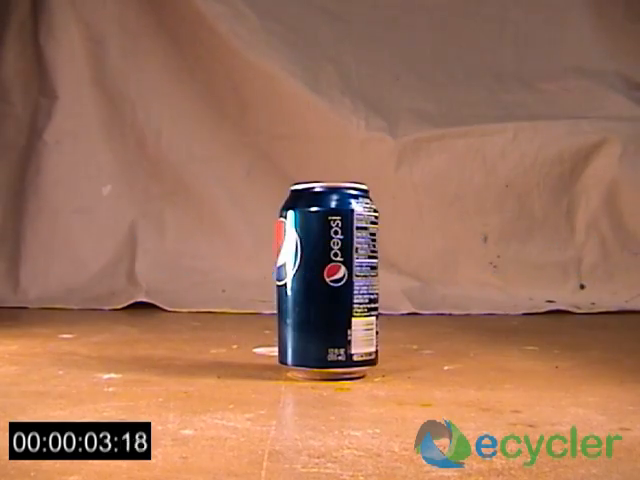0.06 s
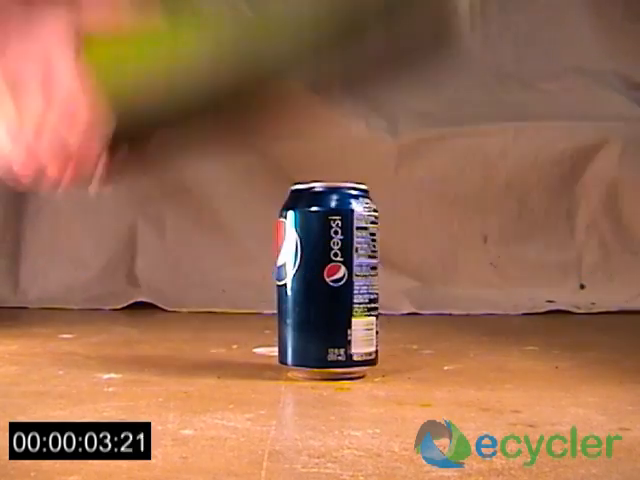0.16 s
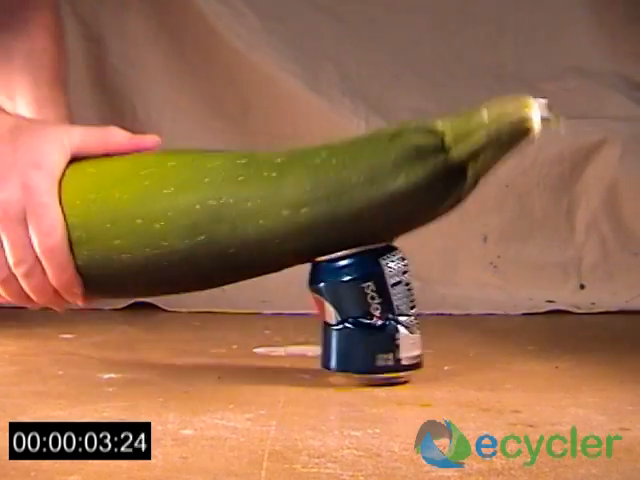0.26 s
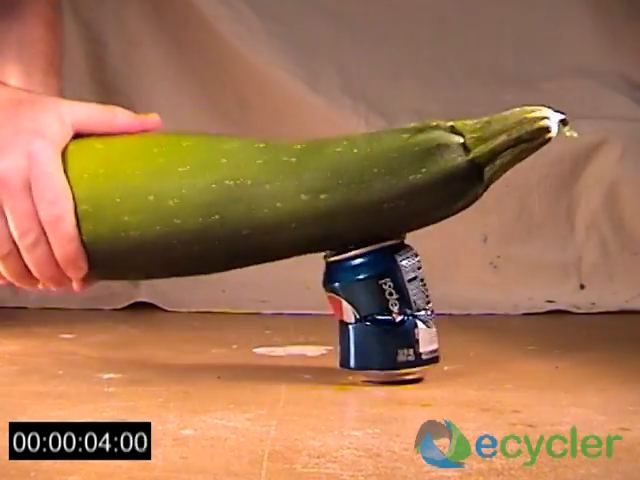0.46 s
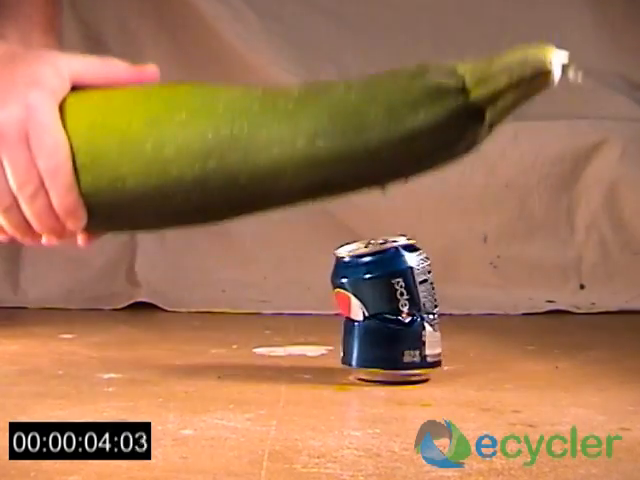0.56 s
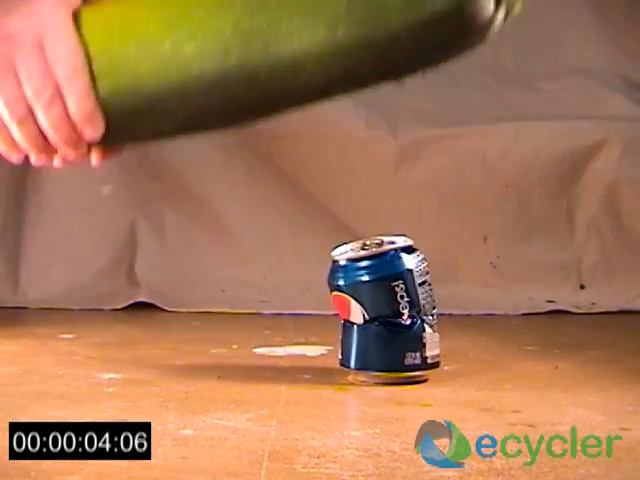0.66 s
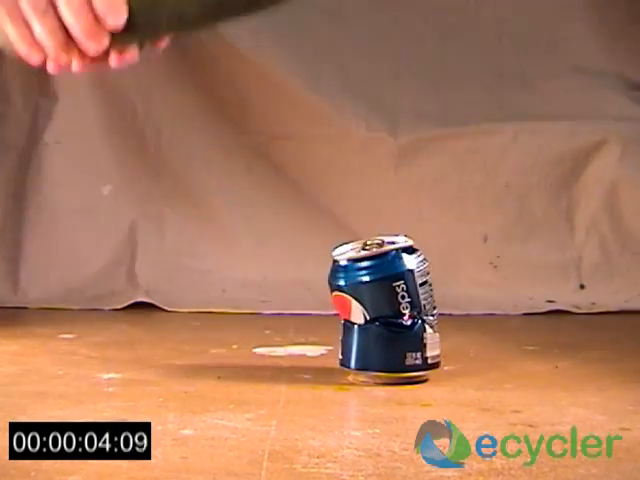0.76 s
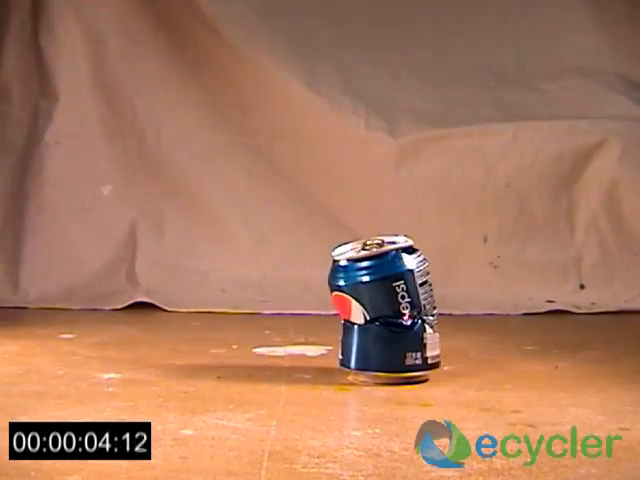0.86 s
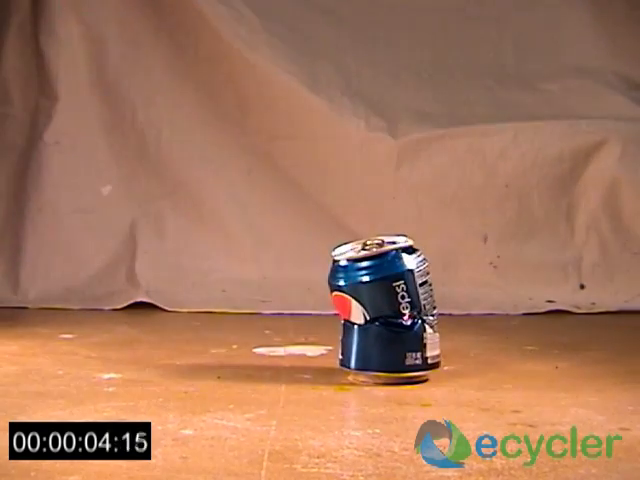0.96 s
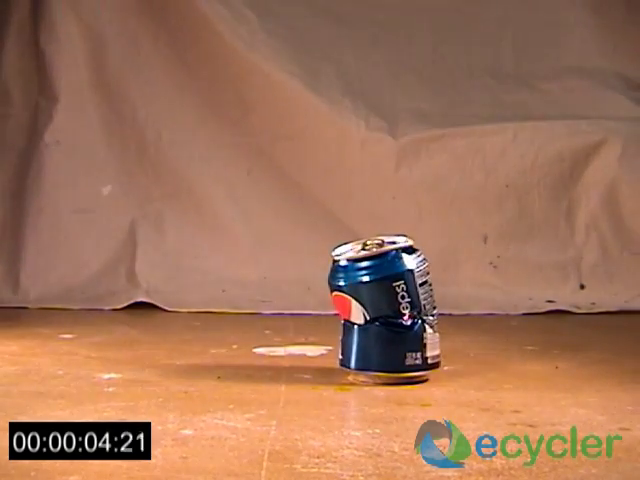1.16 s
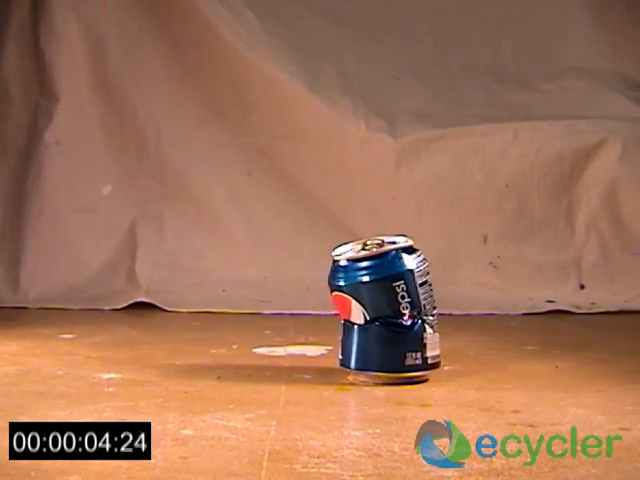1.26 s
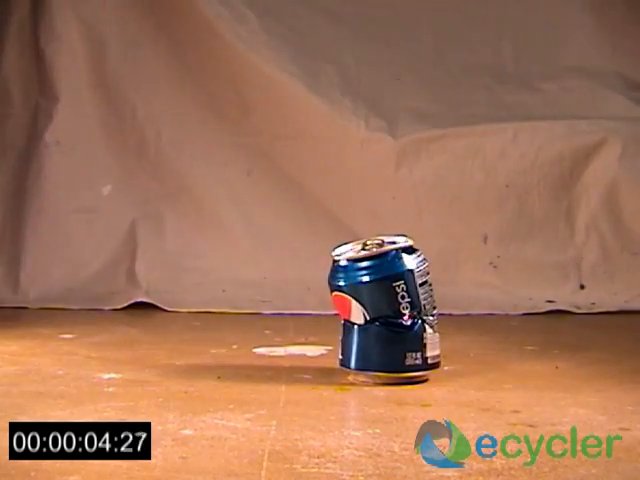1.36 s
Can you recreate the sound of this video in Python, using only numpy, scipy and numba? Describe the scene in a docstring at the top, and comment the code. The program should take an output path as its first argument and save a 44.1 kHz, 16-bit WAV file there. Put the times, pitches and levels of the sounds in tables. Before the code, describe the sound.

An empty aluminium can crunches under a heavy blow, then rocks with a few clinks.

```python
"""A small room, two microphones close to an empty aluminium can standing on a wooden table.
Over quiet room noise a big marrow swishes down. The can wall cracks and crumples in a run of snaps,
the table booms under the shoves, and the recorder's limiter flattens the blow.
Let go, the dented can rocks on its base with a few clinks that die away.
Last comes one tiny creak from the dent."""
import sys
import numpy as np
from scipy import signal
from scipy.fft import irfft, next_fast_len
from scipy.io import wavfile
from numba import njit

SR = 44100
rng = np.random.default_rng(int(sys.argv[2]) if len(sys.argv) > 2 else 0)


def inscribe(sig):
    """Save sig as 16-bit PCM at rate SR to the path in sys.argv[1].

    A 1-D sig is mono; a 2-D sig holds one channel per row.
    Samples are clipped to [-1, 1] before scaling.
    """
    pcm = np.round(np.clip(np.atleast_2d(sig).T, -1, 1) * 32767)
    wavfile.write(sys.argv[1], SR, pcm.astype(np.int16))


N = 61739

# Spectra give relative level per hertz; the noise made from them is scaled to rms 1.
# spectrum of the quiet room: f/Hz, level/dB
ROOM_TONE_SPECTRUM = [(20, -32.5), (59, -19), (84, -4), (180, -2), (212, -11.5), (242, 1), (270, -7.5),
                      (575, -10.5), (1070, -15.5), (2350, -27), (2550, -22), (6210, -30.5), (16000, -38.5)]
# reverberation time of the room: f/Hz, t60/s
ROOM_DECAY = [(150, 0.32), (600, 0.51), (1800, 0.49), (4200, 0.48), (9000, 0.34), (15000, 0.22)]
# rustle of the swing as the marrow comes down: t/s, level/dB
SWING_LEVELS = [(0.0, -58), (0.06, -52), (0.088, -44), (0.23, -51)]
# spectrum of that rustle: f/Hz, level/dB
SWING_SPECTRUM = [(100, -23.5), (350, -0.5), (1500, 1), (2300, -13.5), (8000, -11.5), (15000, -29)]
# touch-downs of the rocking can: t/s, ring level/dB, clatter level/dB, tick level/dB,
# pitch factor of the tick, landing spot (0 rim, 1 base), contact/s, rebound level/dB
TOUCH_DOWNS = [(0.528, -33.5, -27.5, -42, 1.1, 0, 0.0012, -2.5),
               (0.569, -21.5, -28, -38, 0.91, 0.14, 0.0075, -1),
               (0.619, -38, -31.5, -47, 1.1, 0.94, 0.0066, -8),
               (0.643, -15, -26.5, -22.5, 1.096, 0.19, 0.00025, 4),
               (0.708, -14.7, -21, -26.5, 1.07, 0.93, 0.00058, -5),
               (0.7495, -23.5, -21.5, -31, 1, 0, 0.0003, -4.5)]
# modes of the dented can: f/Hz, level struck on the rim/dB, level on the base/dB, t60 on the base/s
DENTED_CAN_MODES = [(463, -9, -20, .22), (538, -14, -9, .45), (858, -21, -17, .42), (969, -10, -24, .27),
                    (1068, -11, -3, .14), (1115, -7, -14, .13), (1268, -16, -16, .24), (1433, -20, -6, .07),
                    (1598, 0, -5, .12), (1780, -1, -14, .11), (1955, -7, -4, .07), (2863, -21, -1, .115),
                    (2995, -27, -11, .07), (3149, -25, -24, .22)]
# spectrum of the crowd of short modes in the dent and the table: f/Hz, level/dB
CLATTER_SPECTRUM = [(330, -17.5), (490, -4.5), (700, -11), (1100, 6.5), (1400, -4.5), (1850, 2.5),
                    (2350, -12.5), (3100, -6.5), (4500, -37)]
# spectrum of metal touching wood, before each tick's pitch factor: f/Hz, level/dB
TICK_SPECTRUM = [(1000, 0), (6400, 2.5), (8600, 0), (10500, -20.5), (16000, -40)]
# shoves of the marrow through the can into the table: t/s, level/dB
MARROW_SHOVES = [(0.2215, 0), (0.2466, 3), (0.268, -3), (0.284, 0.5), (0.302, -0.5), (0.326, -4),
                 (0.351, 0), (0.366, -10.5), (0.444, -12), (0.466, -23)]
# spectrum of the dull part of a shove: f/Hz, level/dB
THUD_SPECTRUM = [(40, -38.5), (100, -14), (180, -8), (380, 4), (520, -0.5), (750, 1), (1100, -1.5),
                 (1700, -16.5), (3500, -36)]
# modes of the table top with the can pressed on it: f/Hz, level/dB
TABLE_TOP_MODES = [(157, -11), (247, -3), (317, -9), (364, -6), (406, -4), (447, -6), (565, -5), (641, 1),
                   (663, -3), (727, -3), (757, -5), (782, -3), (851, -3), (929, -3), (1101, -4), (1309, -5),
                   (1446, -9)]
# spectrum of the first crack of the can wall: f/Hz, level/dB
CRACK_SPECTRUM = [(30, -8.5), (150, 1), (500, -18), (1300, 3), (5000, -3), (10000, -6.5), (16000, -13.5)]
# course of the buckling as the wall folds: t/s, level/dB
BUCKLING_LEVELS = [(0.224, -11), (0.246, -3), (0.256, -10.5), (0.293, -11.5), (0.335, -12), (0.365, -19.5),
                   (0.392, -15), (0.412, -22), (0.45, -49), (0.53, -40.5)]
# spectrum of one buckle: f/Hz, level/dB
BUCKLE_SPECTRUM = [(200, -20), (700, 4), (1400, -4), (2100, -1), (2700, -7), (4100, -0.5), (5600, -8),
                   (9800, -9.5), (12000, -19), (16000, -22.5)]
# creases that snap through with a bright ping: t/s, level/dB, f/Hz
CREASE_SNAPS = [(0.2404, -6.5, 4630), (0.244, -1.5, 10200), (0.2923, -10.5, 10800), (0.387, -31, 9000)]

SPLIT_HZ, ROOM_TONE_SPLIT_HZ = 9100, 3040  # the two microphones differ more and more towards these
ROOM_TONE_DB, ROOM_BUILD_S = -47, 0.0016
CLATTER_T60_S, TICK_T60_S, REBOUND_S = 0.045, 0.066, 0.00763
CLATTER_ECHO_DB, RING_ECHO_DB = -10.5, -18
RIM_DAMPING = 0.32  # share of the ring time lost when the can leans on its rim
CAN_LOW_HZ = 295.6  # the small can radiates little below this
THUMP_HZ, THUMP_DB, THUMP_T60_S = 114.5, -10, 0.039
THUD_DB, THUD_T60_S, THUD_RISE_S, THUD_ECHO_DB = -9.5, 0.11, 0.0044, -7.5
TABLE_DB, TABLE_T60_S, TABLE_LONG_HZ = -19, 0.155, 240  # t60 of the high modes; doubled at this pitch
HIT_S, CRACK_DB, CRACK_T60_S, CREASE_T60_S = 0.2222, 2.5, 0.028, 0.022
BUCKLES_PER_S, BUCKLE_SPREAD_DB, BUCKLE_T60_S, WALL_ECHO_DB = 830, 2.5, 0.023, -5
LIMIT_DB, LIMIT_ATTACK_S, LIMIT_RELEASE_S = -3, 0.00051, 0.025
LOW_CUT_HZ, HIGH_CUT_HZ = 25, 15900


def amp(db):
    """Decibels to gain."""
    return 10 ** (np.asarray(db) / 20)


def unit_rms(x):
    """Scale to rms 1."""
    return x / np.sqrt(np.mean(x ** 2))


def since(start):
    """Seconds since start, zero before it."""
    return np.maximum(np.arange(N) / SR - start, 0)


def fader(points):
    """Gain along (t/s, level/dB) points, silent outside them."""
    return amp(np.interp(since(0), *np.array(points).T, left=-200, right=-200))


def over_hz(points, hz):
    """Read (f/Hz, value) points on a log-frequency axis."""
    freqs, values = np.array(points).T
    return np.interp(np.log(np.maximum(hz, 1)), np.log(freqs), values)


def noise(spectrum, split_hz=SPLIT_HZ):
    """Coloured noise of rms 1 at the microphone pair: alike in the bass, wider in the treble."""
    size = next_fast_len(N, real=True)
    hz = np.fft.rfftfreq(size, 1 / SR)
    mid, side = np.exp(2j * np.pi * rng.random((2, len(hz))))
    width = np.clip(0.021 + hz / np.hypot(split_hz, hz), 0, 1)
    pair = (mid + np.array([[1], [-1]]) * width * side) / np.hypot(1, width)
    return unit_rms(irfft(pair * amp(over_hz(spectrum, hz)), size)[:, :N])


def strike(start, t60, contact=1 / 5000):
    """Envelope of a blow: rises over the contact time, then dies away."""
    t = since(start)
    return np.minimum(t / contact, 1) * np.exp(-np.log(1000) * np.maximum(t - contact, 0) / t60)


def ring(start, modes, contact=1 / 2000):
    """Decaying modes (f/Hz, level/dB, t60/s) set off together, alternating in sign."""
    t = since(start)
    return sum((-1) ** k * amp(db) * strike(start, t60, contact) * np.sin(2 * np.pi * hz * t)
               for k, (hz, db, t60) in enumerate(modes))


def reverberate(x, echo):
    """What the room sends back to the two microphones."""
    return signal.fftconvolve(np.atleast_2d(x), echo, axes=1)[:, :N]


def room_tone():
    """Steady, low noise of the small room, behind everything else."""
    return amp(ROOM_TONE_DB) * noise(ROOM_TONE_SPECTRUM, ROOM_TONE_SPLIT_HZ)


def room_echo():
    """Diffuse impulse response of the room: it builds quickly, then each band decays at its own rate."""
    white = noise([(20, 0), (20000, 0)])[:, :SR // 2]
    hz, t, bands = signal.stft(white, SR, nperseg=256)
    decay = np.exp(-np.log(1000) * t / over_hz(ROOM_DECAY, hz)[:, None])
    tail = signal.istft(bands * decay, SR)[1]
    tail *= 1 - np.exp(-np.arange(tail.shape[1]) / SR / ROOM_BUILD_S)
    return tail / np.sqrt(np.sum(tail ** 2) / 2)


def marrow_swing():
    """Faint rustle of the swing, just ahead of the blow."""
    return fader(SWING_LEVELS) * noise(SWING_SPECTRUM)


def metal_ping(start, db, hz, t60):
    """Short, rough snap of thin metal around one pitch."""
    return amp(db) * strike(start, t60) * noise([(hz / 2, -24), (hz, 0), (hz * 1.56, -30)])


def rocking_can(echo):
    """Each touch-down rings, clatters and ticks; where it lands sets which modes speak and how long."""
    rings, rattle, ticks = 0, 0, 0
    for start, ring_db, clatter_db, tick_db, tick_pitch, on_base, contact, rebound_db in TOUCH_DOWNS:
        t60_share = 1 - RIM_DAMPING * (1 - on_base)
        modes = [(hz, rim_db + on_base * (base_db - rim_db), t60_share * t60)
                 for hz, rim_db, base_db, t60 in DENTED_CAN_MODES]
        rings += amp(ring_db) * ring(start, modes, contact)
        landing = strike(start, CLATTER_T60_S, contact)
        rebound = strike(start + REBOUND_S, CLATTER_T60_S, contact)  # the rim rattles once more
        rattle += amp(clatter_db) * (landing + amp(rebound_db) * rebound)
        tick_noise = noise([(hz * tick_pitch, db) for hz, db in TICK_SPECTRUM])
        ticks += amp(tick_db) * strike(start, TICK_T60_S, contact) * tick_noise
    clatter = rattle * noise(CLATTER_SPECTRUM)
    into_room = amp(RING_ECHO_DB) * (rings + ticks) + amp(CLATTER_ECHO_DB) * clatter
    can = rings + clatter + ticks + reverberate(into_room, echo)
    return signal.sosfilt(signal.butter(2, CAN_LOW_HZ, "high", fs=SR, output="sos"), can)


def table_boom(echo):
    """The whole table gives under the blow; each shove then thuds and feeds the modes of the top."""
    thump = ring(HIT_S, [(THUMP_HZ, THUMP_DB, THUMP_T60_S)])
    shoves = sum(amp(db) * strike(start, THUD_T60_S, THUD_RISE_S) for start, db in MARROW_SHOVES)
    thud = amp(THUD_DB) * shoves * noise(THUD_SPECTRUM)
    rings = 0
    for (hz, mode_db), phase in zip(TABLE_TOP_MODES, rng.random(len(TABLE_TOP_MODES))):
        t60 = TABLE_T60_S * (1 + TABLE_LONG_HZ / hz)
        energy = sum((amp(db) * strike(start, t60, contact=2 / hz)) ** 2 for start, db in MARROW_SHOVES)
        tone = np.sin(2 * np.pi * (hz * since(0) + phase))
        rings += amp(TABLE_DB + mode_db) * np.sqrt(energy) * tone
    return thump + rings + thud + amp(THUD_ECHO_DB) * reverberate(thud, echo)


def crumpling_can(echo):
    """Close up: one sharp crack, then a dense run of snaps as the wall folds, a few of them bright."""
    buckles = rng.random(N) < BUCKLES_PER_S / SR
    snaps = buckles * amp(BUCKLE_SPREAD_DB * np.minimum(rng.exponential(size=N), 4))
    kept_per_sample = np.exp(-2 * np.log(1000) / BUCKLE_T60_S / SR)
    energy = signal.lfilter([1], [1, -kept_per_sample], snaps ** 2)
    buckling = unit_rms(np.sqrt(energy)) * fader(BUCKLING_LEVELS) * noise(BUCKLE_SPECTRUM)
    crack = amp(CRACK_DB) * strike(HIT_S, CRACK_T60_S) * noise(CRACK_SPECTRUM)
    wall = crack + buckling
    creases = sum(metal_ping(start, db, hz, CREASE_T60_S) for start, db, hz in CREASE_SNAPS)
    return wall + creases + amp(WALL_ECHO_DB) * reverberate(wall + creases / 2, echo)


def scene():
    """At the microphones: room tone, swing, blow, rocking can and the last creak of the dent."""
    echo = room_echo()
    swing = marrow_swing()
    background = room_tone()
    creak = metal_ping(start=1.249, db=-37.5, hz=5830, t60=0.0092)
    return background + swing + crumpling_can(echo) + table_boom(echo) + rocking_can(echo) + creak


@njit
def limiter_level(peaks):
    """The level the limiter follows: quick up, slower down."""
    attack, release = 1 / (LIMIT_ATTACK_S * SR), 1 / (LIMIT_RELEASE_S * SR)
    levels, level = np.empty(len(peaks)), 0.
    for i in range(len(peaks)):
        level += (peaks[i] - level) * (attack if peaks[i] > level else release)
        levels[i] = level
    return levels


def record(dry):
    """The recorder's limiter holds the blow down, the first peak clips, and both band ends are cut."""
    level = limiter_level(np.abs(dry).max(axis=0))
    reduction = np.maximum(level / amp(LIMIT_DB), 1)
    held = np.clip(dry / reduction, -1, 1)
    low_cut = signal.butter(2, LOW_CUT_HZ, "high", fs=SR, output="sos")
    high_cut = signal.ellip(10, .2, 70, HIGH_CUT_HZ, fs=SR, output="sos")
    return signal.sosfilt(high_cut, signal.sosfilt(low_cut, held))


dry = scene()
out = record(dry)
inscribe(out)
```